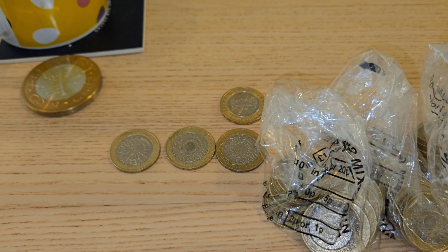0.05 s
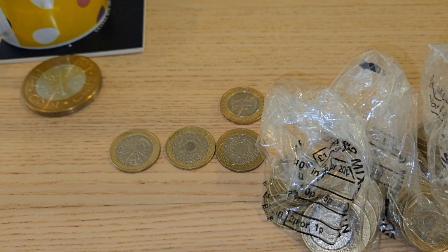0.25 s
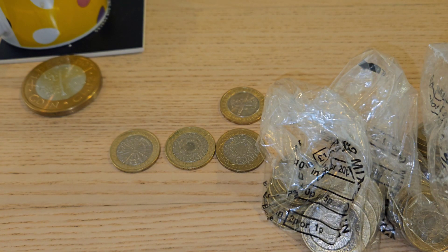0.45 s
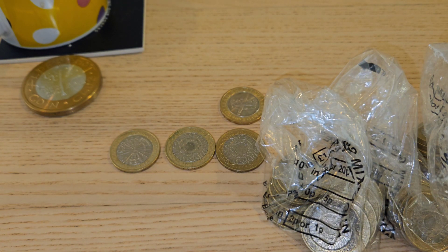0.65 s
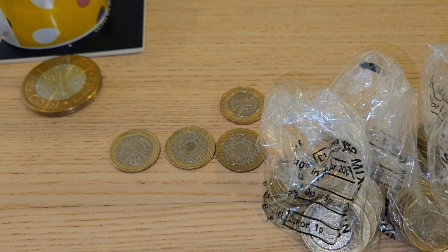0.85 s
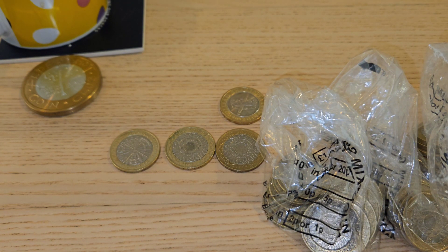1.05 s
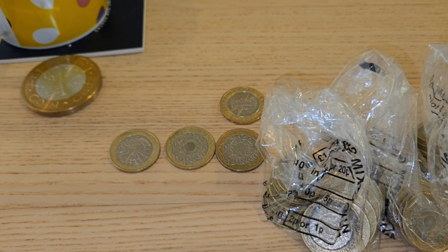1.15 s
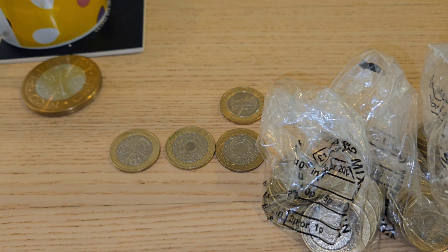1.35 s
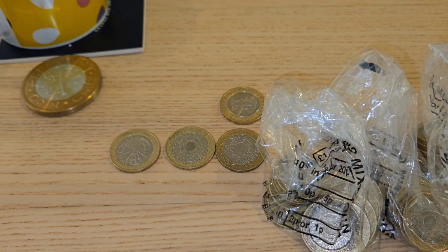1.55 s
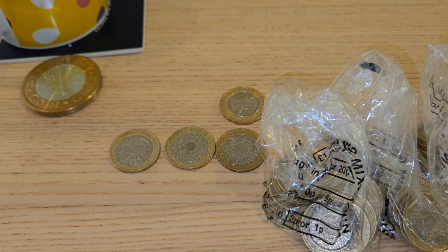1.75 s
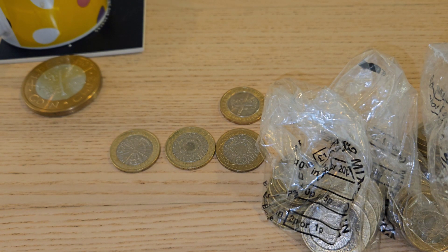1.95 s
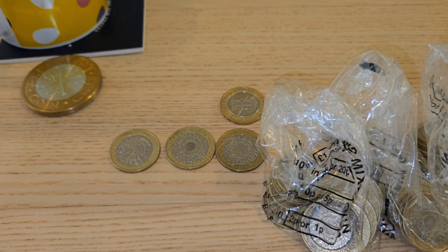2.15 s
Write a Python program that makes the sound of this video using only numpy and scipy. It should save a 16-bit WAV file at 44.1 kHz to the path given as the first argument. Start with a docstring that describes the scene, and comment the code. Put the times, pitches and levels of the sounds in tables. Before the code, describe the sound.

Metal coins rasp and tumble together in a plastic bag, with short, bright clinks and low bumps on a wooden tabletop. Quieter crackling follows as the bag is handled, heard close up in a small room.

```python
"""Coins slide, tumble and clink inside a thin plastic bag handled on a wooden table.
Their milled rims rasp over each other, and each blow gives a choked clack with a short, high ring.
The load knocks on the wood, a low thud under a dull clatter. After a short rest the fingers go on
crinkling the bag, buckling its creases. It all sounds close, in a small room with faint steady noise."""
import sys
import numpy as np
from scipy import signal
from scipy.fft import rfft, irfft
from scipy.io import wavfile
from scipy.ndimage import uniform_filter1d

SR = 44100
rng = np.random.default_rng(int(sys.argv[2]) if len(sys.argv) > 2 else 0)


def wav_out(sig):
    """Save sig, one row per channel (or a flat mono array), as 16-bit PCM at SR to the path in sys.argv[1]."""
    wavfile.write(sys.argv[1], SR, np.round(np.clip(np.atleast_2d(sig).T, -1, 1) * 32767).astype(np.int16))


N = 97020
HZ = np.fft.rfftfreq(4096, 1 / SR)  # frequency grid of the tone colours
LAG_S, LAG_SPREAD_S = .00013, .000032  # left channel's delay and its spread from spot to spot

# Bright tone of coin on coin (frequency [Hz], gain [dB])
COIN_TONE = [(100, -6.5), (400, -11.5), (900, -10.5), (3700, -7), (4700, -0.5), (5800, -3.5), (7500, 0.5),
             (9500, 1), (11200, -0.5), (12600, 3), (14000, -0.5), (16000, -2.5)]
# Envelopes of the sliding coins (time [s], relative rasp level [dB], relative ring level [dB])
SLIDE_ENVELOPES = [(.222, -41, -52), (.3, -46.5, -51), (.325, -39, -46), (.383, -47.5, -42),
                   (.415, -44, -50), (.442, -21.5, -34), (.452, -23, -34.5), (.464, -19, -19.5),
                   (.503, -30.5, -41.5), (.525, -24.5, -28.5), (.549, -32, -39), (.566, -24.5, -29.5),
                   (.6, -31.5, -34.5), (0.619, -55, -49), (.638, -29, -26), (.658, -39, -56),
                   (.7, -57, -72)]
def coin_slide(rasp_gain_db=.5, ring_gain_db=5.5):
    """Milled rims rasp over each other; they catch and slip, so the ring flutters."""
    times, rasp_db, ring_db = np.transpose(SLIDE_ENVELOPES)
    rasp = grains(per_s=2000, spread_db=2, clump_db=.8) * envelope(np.c_[times, rasp_db])
    slips = grains(per_s=1500, spread_db=-1.5, clump_db=3) * envelope(np.c_[times, ring_db])
    return amp(rasp_gain_db) * facets(rasp, COIN_TONE, uneven_db=2.5) + amp(ring_gain_db) * ring(slips)


# Coin striking coin (time [s], level [dB], clack pitch [Hz])
COIN_HITS = [(.1955, -30, 7300), (.2232, -18, 6800), (.2238, -23, 12700), (.4102, -25, 12600),
             (.4268, -26, 12500), (.4348, -21, 7800), (.4661, -10.5, 7500), (.467, -13, 10300),
             (.4837, -12, 7500), (.4848, -15, 12600), (.4885, -21, 10300), (.5117, -18, 8300),
             (.516, -15, 13000), (.528, -18, 13500), (.5344, -20, 10200), (.554, -20, 12600),
             (.5628, -18, 5000), (.5632, -13.5, 8600), (.5675, -20, 12500), (.589, -25, 8700),
             (.6325, -21, 12400), (.6367, -18, 12600), (.6402, -24, 12300), (.817, -34, 8300),
             (1.908, -31, 12700)]
def coin_clinks(clack_s=.00038, ring_db=-16):
    """Each blow is a hard chatter and a choked clack, with a little ring."""
    t = np.arange(SR // 50) / SR
    choke = t / clack_s * np.exp(1 - t / clack_s)
    chatter, clacks = np.zeros((2, N))
    for s, db, hz in COIN_HITS:
        add(chatter, s, amp(db) * burst(decay_s=.001))
        add(clacks, s, amp(db) * choke * np.sin(2 * np.pi * hz * t))
    return facets(chatter, COIN_TONE, uneven_db=2.5) + stereo(clacks) + amp(ring_db) * ring(chatter)


# Modes of coins damped by their neighbours (frequency [Hz], relative level [dB], T60 [s])
COIN_MODES = [(10130, -1, .035), (10250, 0, .035), (10430, -3, .03)]
def ring(contacts, drift_hz=70):
    """Each jostled coin gives a short high ring, whose pitch drifts as its neighbours press on it."""
    t = np.arange(SR // 5) / SR
    modes = np.array([amp(db - 60 * t / t60) * np.exp(2j * np.pi * hz * t)
                      for hz, db, t60 in COIN_MODES])
    out = np.zeros((2, N))
    for mode in modes / np.linalg.norm(modes.imag):
        drift = np.exp(2j * np.pi * np.cumsum(drift_hz * wander(N, size=1100)) / SR)
        ringing = signal.oaconvolve(scatter(contacts), mode)[:N]
        out += stereo((ringing * drift).imag, rng.normal(LAG_S, LAG_SPREAD_S))
    return out


# Low body of the wooden table (frequency [Hz], gain [dB])
WOOD_TONE = [(25, -38), (70, -7.5), (140, -1), (230, -3), (450, -18), (5000, -55.5)]
# Dull tone of the landing load (frequency [Hz], gain [dB])
CLATTER_TONE = [(80, -9), (500, 0.5), (900, -5.5), (1600, -4), (3300, -3.5), (4500, -2.5), (8000, -12.5),
                (16000, -30)]
# The load bumping on the table (time [s], thud level [dB], clatter level [dB])
TABLE_HITS = [(0.217, -45, -34), (.407, -33, -16.5), (.433, -36.5, -24.5), (0.456, -32.5, -45),
              (0.484, -37, -43), (0.563, -52, -30), (0.745, -40, -29.5), (.754, -45.5, -62),
              (.769, -55, -42.5), (.861, -45.5, -40), (0.983, -62, -32), (1.82, -50, -36)]
def table_knocks():
    """The bagged coins land on wood: a low thud under a dull clatter."""
    thuds, clatters = np.zeros((2, N))
    for s, thud_db, clatter_db in TABLE_HITS:
        add(thuds, s, amp(thud_db) * burst(decay_s=.015))
        add(clatters, s, amp(clatter_db) * burst(decay_s=.0057))
    return stereo(colour(thuds, curve(WOOD_TONE)) + colour(clatters, curve(CLATTER_TONE)))


# Crisp tone of the plastic film (frequency [Hz], gain [dB])
FILM_TONE = [(300, -22), (1500, -5), (3000, -1), (4500, 3.5), (6200, .5), (8400, 0), (9700, -5.5),
             (11200, -6), (12600, .5), (13800, -4.5), (15800, -6.5)]
# Hollow tone of the pouch (frequency [Hz], gain [dB])
POUCH_TONE = [(30, -19.5), (110, -7), (250, -1), (400, 3.5), (680, -4.5), (1600, -6.5), (3500, -3.5),
              (9000, -44)]
# Bed of steady handling (time [s], relative level [dB])
HANDLING_BED = [(0, -46.5), (.17, -56), (.42, -52), (.7, -51.5), (.78, -49.5), (.9, -78.5), (.973, -67),
                (.995, -51.5), (1.1, -52.5), (1.17, -45), (1.31, -50.5), (1.39, -46.5), (1.58, -50.5),
                (1.66, -48.5), (1.76, -48.5), (1.86, -47), (1.98, -49), (2.2, -48)]
# Fingers squeezing the bag (time [s], relative crackle level [dB], relative rustle level [dB])
FINGER_SQUEEZES = [(0.075, -43, -64), (0.203, -42, -52.5), (0.669, -46, -43.5), (1.016, -46.5, -51.5),
                   (1.122, -40.5, -46), (1.231, -48.5, -49), (1.476, -45.5, -50), (1.536, -55, -43),
                   (1.611, -41.5, -40), (1.807, -43, -41.5), (1.902, -46.5, -48), (1.994, -46, -47.5),
                   (2.067, -44.5, -52), (2.171, -42.5, -45)]
# Short crisp snaps: the mid-range crack of the first loud coin clink, then creases of the bag
# (time [s], relative level [dB])
CRISP_SNAPS = [(.2238, -22), (.981, -39), (.984, -32), (.9874, -34), (1.0445, -37), (1.0895, -37),
               (1.1634, -33), (1.2471, -36), (1.3333, -35), (1.407, -31), (1.4155, -31), (1.4878, -29),
               (1.5803, -32.5), (1.6254, -28), (1.907, -32), (2.007, -28), (2.0144, -30), (2.1183, -29.5)]
def bag_crinkle(rise_s=.0094, fall_s=.024, crackle_gain_db=5, rustle_gain_db=2.5, snap_gain_db=4.5):
    """Creases buckle in clumps, harder at each squeeze; the film crackles and the hollow pouch rustles."""
    creases = grains(per_s=2700, spread_db=2.5, clump_db=2.82)
    t = np.arange(SR // 4) / SR
    squeeze = np.minimum(t / rise_s, 1) * np.exp(-np.maximum(t - 2 * rise_s, 0) / fall_s)
    film_power = envelope(HANDLING_BED) ** 2
    pouch_power = film_power * amp(-2.5) ** 2
    for s, crackle_db, rustle_db in FINGER_SQUEEZES:
        add(film_power, s, (amp(crackle_db) * squeeze) ** 2)
        add(pouch_power, s, (amp(rustle_db) * squeeze) ** 2)
    snaps = np.zeros(N)
    for s, db in CRISP_SNAPS:
        add(snaps, s, amp(db + snap_gain_db) * burst(decay_s=.0012))
    crackle = amp(crackle_gain_db) * creases * np.sqrt(film_power)
    rustle = amp(rustle_gain_db) * creases * np.sqrt(pouch_power)
    film = facets(crackle + snaps, FILM_TONE, uneven_db=.73)
    return film + facets(scatter(rustle), POUCH_TONE, uneven_db=3)


# Reverb time of the room (frequency [Hz], T60 [s])
ROOM_DECAY = [(100, 0.056), (1000, 0.44), (6000, 0.18), (16000, 0.078)]
def room(x, wet_db=-9):
    """A small furnished room adds a short tail that lasts longest in the mids."""
    t = np.arange(SR // 2) / SR
    hz, times, noise = signal.stft(rng.standard_normal((2, len(t))), SR, nperseg=256)
    decay = amp(-60 * times / curve(ROOM_DECAY, hz)[:, None])
    tail = signal.istft(noise * decay, SR, nperseg=256)[1][:, :len(t)]
    tail *= t > .002  # pre-delay
    tail /= np.linalg.norm(tail, axis=1, keepdims=True)
    return x + amp(wet_db) * signal.fftconvolve(x, tail, axes=1)[:, :N]


# Dark tone of the room noise (frequency [Hz], gain [dB])
AIR_TONE = [(25, 1.5), (160, 13.5), (700, -7), (8000, -41)]
def room_tone(level_db=-62.5, width=.12):
    """Faint steady room noise, almost mono."""
    centre, left, right = (colour(rng.standard_normal(N), curve(AIR_TONE)) for _ in range(3))
    return amp(level_db) * unit(centre + width * np.array([left, right]))


def grains(per_s, spread_db, clump_db):
    """Random clicks of uneven size that come in clumps."""
    size_db = spread_db * np.minimum(rng.exponential(1, N), 4)
    size_db += clump_db * np.clip(wander(N, size=260), -2, 2)
    return unit(scatter(amp(size_db)) * (rng.random(N) < per_s / SR))


def burst(decay_s):
    """A quick run of tiny contacts that builds at once and dies away."""
    t = np.arange(SR // 10) / SR
    fade = np.minimum(t / decay_s * 4, 1) * np.exp(-t / decay_s)
    contacts = rng.standard_normal(len(t)) * fade
    return contacts * np.linalg.norm(fade) / np.linalg.norm(contacts)


def facets(clicks, tone, uneven_db, count=16):
    """Each click comes from one of several spots, each with its own resonances and place."""
    spot = np.repeat(rng.integers(0, count, N // 64 + 1), 64)[:N]
    out = np.zeros((2, N))
    for k in range(count):
        spot_db = curve(tone) + uneven_db * wander(len(HZ), size=70)
        out += stereo(colour(clicks * (spot == k), spot_db), rng.normal(LAG_S, LAG_SPREAD_S))
    return out


def scatter(clicks):
    """The same clicks, each pushing in a random direction."""
    return clicks * rng.choice([-1., 1.], N)


def wander(count, size):
    """Smooth random motion of rms one, changing over size samples."""
    return unit(uniform_filter1d(uniform_filter1d(rng.standard_normal(count), size), size))


def colour(x, db):
    """Minimum-phase EQ of unit energy with the given shape."""
    log_gain = np.log(amp(np.r_[db, db[-2:0:-1]]))
    taps = np.fft.ifft(np.exp(np.conj(signal.hilbert(log_gain)))).real
    return signal.oaconvolve(x, taps / np.linalg.norm(taps))[:N]


def stereo(x, lag_s=LAG_S):
    """Pans a source by delaying the left channel."""
    delay = np.sinc(np.arange(-16, 33) - lag_s * SR)
    return np.array([np.convolve(x, delay)[16:N + 16], x])


def curve(points, hz=HZ):
    """Joins breakpoints on a log-frequency axis."""
    f, value = np.transpose(points)
    return np.interp(np.log(hz + 1), np.log(f), value)


def envelope(rows):
    """Gain over time from a dB curve, silent outside it."""
    return amp(np.interp(np.arange(N) / SR, *np.transpose(rows), left=-200, right=-200))


def add(mix, s, sound):
    """Mixes a sound in at s seconds."""
    part = mix[max(round(s * SR), 0):][:len(sound)]
    part += sound[:len(part)]


def amp(db):
    """Decibels to gain."""
    return 10 ** (np.asarray(db) / 20)


def unit(x):
    """Scales to an rms of one."""
    return x / np.sqrt(np.mean(x ** 2) + 1e-20)


def scene():
    """Coins, table and bag in the room."""
    return room(coin_slide() + coin_clinks() + table_knocks() + bag_crinkle()) + room_tone()


# Stereo balance (frequency [Hz], left minus right [dB])
STEREO_BALANCE = [(100, -1.5), (300, -2), (900, -0.5), (6000, -1.5), (10000, 0.3), (12600, -8), (16000, 2)]
def record(dry, cutoff_hz=16050):
    """Master EQ: the right side is a little brighter, and a steep low-pass trims the top."""
    tilt_db = curve(STEREO_BALANCE, np.fft.rfftfreq(N, 1 / SR)) * np.array([[.5], [-.5]])
    tilted = irfft(rfft(dry) * amp(tilt_db), N)
    lowpass = signal.firwin(511, cutoff_hz, window=("kaiser", 9), fs=SR)
    return signal.oaconvolve(tilted, lowpass[None], "same")


dry = scene()
out = record(dry)
wav_out(out)
```